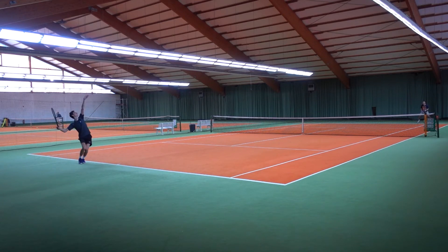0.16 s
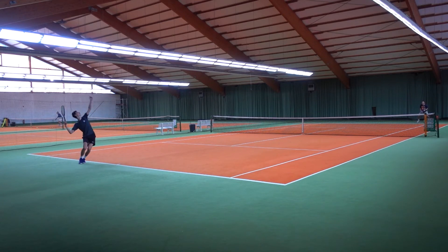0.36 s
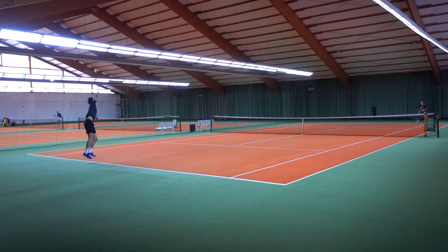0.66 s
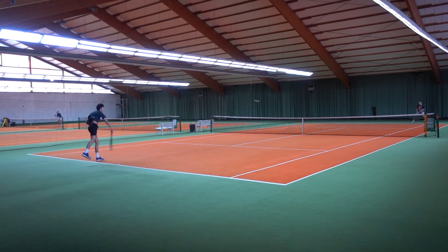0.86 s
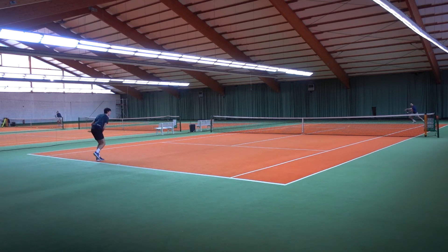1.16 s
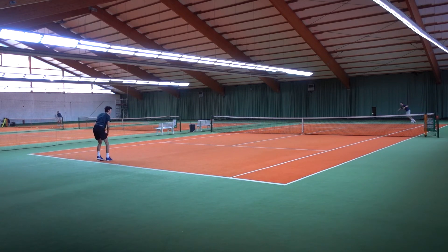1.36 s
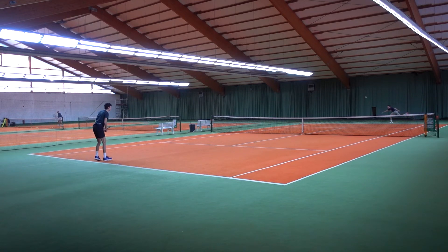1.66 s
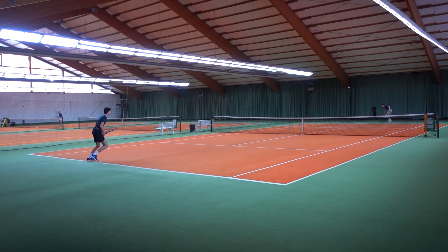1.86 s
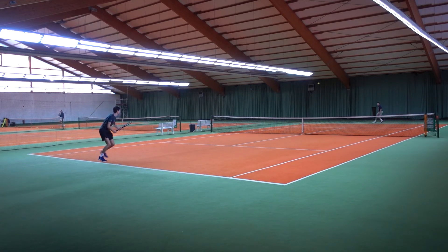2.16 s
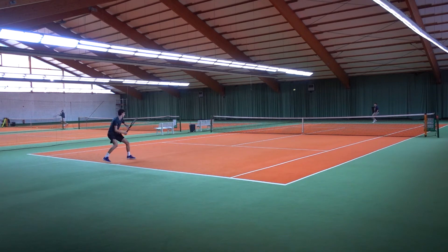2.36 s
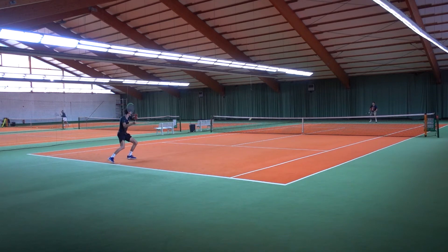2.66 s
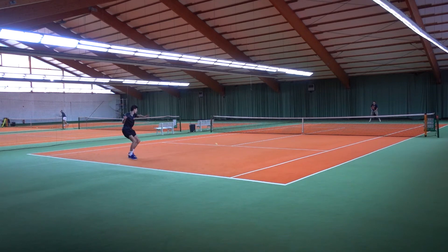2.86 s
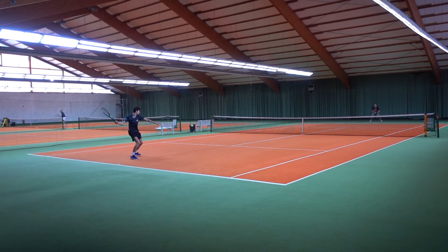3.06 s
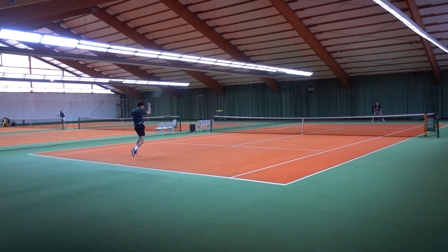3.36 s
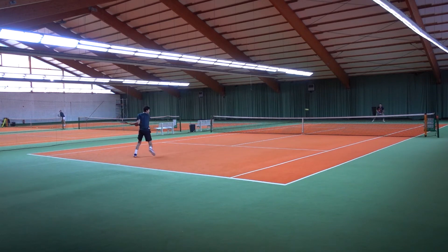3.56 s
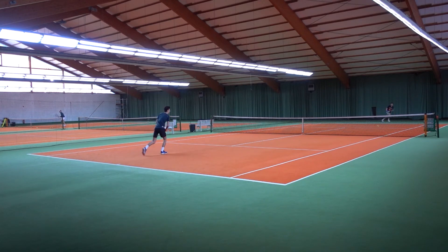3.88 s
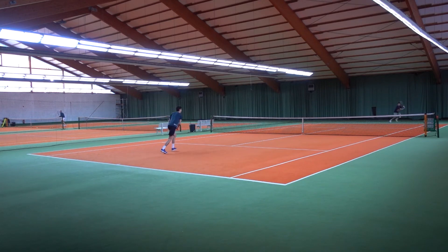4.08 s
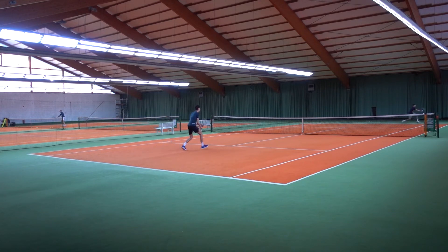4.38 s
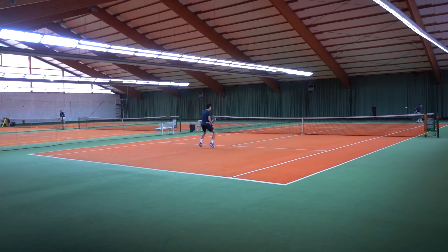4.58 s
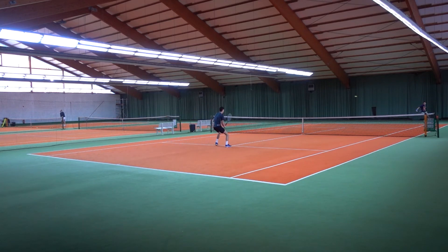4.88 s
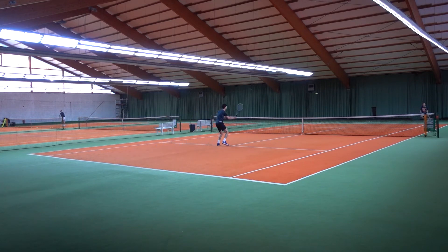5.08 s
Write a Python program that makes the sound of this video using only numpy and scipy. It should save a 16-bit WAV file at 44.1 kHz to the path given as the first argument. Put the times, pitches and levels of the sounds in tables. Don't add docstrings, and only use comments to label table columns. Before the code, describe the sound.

A tennis rally in a large indoor hall, heard from a small stereo microphone at the court corner. A dull bounce comes first, then a hard bright serve crack, a boomy bounce with the far return straight after, further bounces and a softer near stroke. Every hit rings and echoes long over faint ventilation hum and hiss.

```python
import sys
import numpy as np
from scipy import signal
from scipy.fft import rfft, irfft, next_fast_len
from scipy.io import wavfile
from scipy.ndimage import uniform_filter1d

SR = 44100
rng = np.random.default_rng(int(sys.argv[2]) if len(sys.argv) > 2 else 0)


def voltage_ratio(level):
    return 10 ** (np.asarray(level, float) / 20)


def file_out(sig):
    cols = np.atleast_2d(sig).T
    lim = np.clip(cols, -1, 1)
    pcm = np.round(lim * 32767).astype(np.int16)
    wavfile.write(sys.argv[1], SR, pcm)


N = 230363
TIME = np.arange(N) / SR
SIZE = next_fast_len(N)
FREQ = np.maximum(np.fft.rfftfreq(SIZE, 1 / SR), 1)
POP_SAMPLES, POP_LEAD_S = 2048, .001
HOLLOW_HZ = 290
STROKE_ECHO_MS, KNOCK_MS = 3.9, 3.6


def at(table, hz, axis=1):
    rows = np.array(table, float)
    return np.interp(np.log(hz), np.log(rows[:, 0]), rows[:, axis])


def band(x, hz, width_hz):
    return signal.lfilter(*signal.iirpeak(hz, hz / width_hz, fs=SR), x)


def steep(x, hz, width_hz):
    y = band(band(x, hz, width_hz), hz, width_hz)
    return y / np.sqrt(np.mean(y ** 2))


def peak(x, db):
    return x * voltage_ratio(db) / np.abs(x).max()


def pair(mid, side, hz):
    # [f/Hz, likeness 0-1]
    likeness = [(60, 0.7), (125, .99), (250, 1), (500, 0.96), (1000, 0.76), (2000, 0.76), (4000, 0.18),
                (8000, 0.07)]
    c = np.clip(at(likeness, hz), 0, 1)
    return np.sqrt((1 + c) / 2) * mid + np.sqrt((1 - c) / 2) * side * np.array([[1], [-1]])


def walk(rate_hz):
    hold = int(SR / rate_hz)
    steps = np.repeat(rng.standard_normal(N // hold + 1), hold)
    return 0.98 * uniform_filter1d(uniform_filter1d(steps, hold), hold)[:N]


def air():
    # [f/Hz, level/dB per Hz]
    air_spectrum = [(24, -84), (40, -44.5), (98, -25), (417, -9.5), (529, -11), (1100, -11.5),
                    (1500, -17.5), (2650, -21.5), (3440, -25.5), (10500, -30.5), (11500, -40.5),
                    (15000, -76), (22000, -120)]
    # [f/Hz, width/Hz, level/dB]
    duct = (380, 33, -63)
    mid, side = rfft(rng.standard_normal((2, SIZE))) * voltage_ratio(at(air_spectrum, FREQ))
    hiss = irfft(pair(mid, side, FREQ), SIZE)[:, :N]
    duct_hz, duct_width_hz, duct_db = duct
    drone = steep(rng.standard_normal(N), duct_hz, duct_width_hz) * voltage_ratio(duct_db + 1.0 * walk(5.28))
    return hiss * voltage_ratio(-61.5) / np.std(hiss) + drone


def hall():
    # [t/s, near surfaces/dB, far walls/dB, bass/dB, treble/dB]
    tails = [(-.6, -60, -29.5, -7.5, 10), (0.442, -45, -39.5, -1, 2.5), (0.74, -20, -29, -5, -0.5),
             (1.26, -73, -58.5, 14.5, 12), (1.545, -42.5, -43, 0, 1.5), (1.595, -19, -27, -0.5, 2),
             (1.889, -18, -32, -26, -4), (2.261, -36.5, -38.5, 1, 0.5), (2.381, -34, -42, 4, -3),
             (2.903, -50, -53.5, -0.5, -8), (3.351, -22.5, -34, -0.5, 2.5), (3.713, -56, -50.5, 6, 7),
             (3.799, -55, -40, -1, -0.5), (4.452, -46.5, -63, 8, -6), (4.487, -34.5, -45.5, -3.5, -2),
             (4.53, -31, -42.5, 4, -4), (4.575, -21.5, -36, -3.5, 3.5), (5.101, -46, -47, -1.5, 7),
             (5.2, -41, -52, -8, 8)]
    # [f/Hz, colour/dB, reverberation/s]
    room = [(80, -40, 1.2), (160, -19, 2.45), (305, -4.5, 2.15), (690, -3, 1.69), (1160, -8, 1.8),
            (1480, -10.5, 1.77), (2200, -13, 1.47), (2910, -16.5, 1.02), (3460, -19.5, 1.14),
            (4840, -27, 0.93), (5470, -33, 0.89), (8000, -41, 1.1), (11000, -43, 0.73)]
    near_t60_s = 0.32
    echoes = rfft(rng.standard_normal((2, N)) * voltage_ratio(1.5 * walk(150)), SIZE) * voltage_ratio(at(room, FREQ))
    lumps_db = walk(24.77)
    coarse_s = TIME[::32]
    s, near_db, far_db, bass_db, treble_db = np.array(tails).T[:, :, None]
    fill_s = .09 + .003 * (near_db + 40)
    t = np.maximum(coarse_s - s, 0)
    out = 0
    for hz in 70 * 2 ** np.arange(0, 7.4, .4):
        t60_s = at(room, hz, axis=2)
        octave = np.log2(hz / 1000)
        body = np.interp(octave, [1.3, 2.3], [1, .3])
        fill = np.maximum(fill_s * body, .01)
        tilt_db = bass_db * np.clip(-octave, 0, 1) + treble_db * np.clip(octave - 1, 0, 1)
        near = voltage_ratio(near_db + tilt_db - 60 * t / min(near_t60_s, t60_s)) * (1 - np.exp(-t / 0.0038))
        far = voltage_ratio(far_db + tilt_db - 60 * np.maximum(t - fill, 0) / t60_s)
        far = far * np.clip(t / fill, 0, 1) ** 0.56
        size = np.interp(TIME, coarse_s, np.sqrt(np.sum(near ** 2 + far ** 2, axis=0)))
        window = np.cos(np.pi / 2 * np.clip(np.log2(FREQ / hz) / .4, -1, 1)) ** 2
        mid, side = irfft(echoes * window, SIZE)[:, :N]
        level_db = 15.0 + body * (0.4 * lumps_db + 3.3 * walk(12))
        out = out + voltage_ratio(level_db) * size * pair(mid, side, hz)
    return out


def bounces():
    # [t/s, ring/dB, ring f/Hz, thump/dB, echoes/dB]
    court_hits = [
        (0.4438, -27.5, 1700, -29, -14),
        (1.5466, -31, 1306, -19, -6),
        (2.2636, -25, 2120, -30.5, -1),
        (3.7135, -28.5, 2900, -23, -2),
        (4.4868, -20, 1550, -28.5, -9),
        (5.1036, -28.5, 2370, -24, -2),
    ]
    # [delay/s, ring/dB, thump/dB]
    side_walls = [(.058, -6, -6), (.096, -6, -14)]
    crack_db, contact_ms = -24, 5.8
    rows = []
    for s, ring_db, hz, thump_db, echo_db in court_hits:
        thump_hz = HOLLOW_HZ + 11 * (thump_db + 30)
        for lag_s, ring_change, thump_change in [(0, 0, 0)] + side_walls:
            extra_db = echo_db * (lag_s > 0)
            ring = ring_db + ring_change + extra_db
            thump = thump_db + thump_change + extra_db
            rows.append((s + lag_s, ring, ring + crack_db, hz, contact_ms, thump, thump_hz))
    return rows


def rings():
    ring_starts = (.445, .503, .742, .85, 1.0, 1.594, 1.888, 2.39, 2.905, 3.354, 3.42, 3.715, 4.576, 4.72)
    # [f/Hz, width/Hz, level/dB, reverberation/s]
    ring_tones = [
        [(1856, 140, -47, 2.0)],
        [(3600, 1600, -52, 0.9), (1004, 230, -45.5, 2.1)],
        [(2082, 200, -32, 0.8), (993, 220, -35, 1.8), (4340, 1600, -41, 1.1), (8500, 4400, -49, 0.64)],
        [(1200, 250, -33, 1.12)],
        [(560, 200, -41, 1.5)],
        [(481, 150, -31, 1.3), (824, 220, -32.5, 0.82), (2000, 1200, -37, 1.0), (8000, 3700, -58, 0.33)],
        [(807, 65, -21.5, 0.22), (1480, 190, -22.5, 0.34), (2300, 800, -28, 0.65), (2950, 300, -30, 0.6)],
        [(656, 180, -45, 1.25)],
        [(900, 700, -37, 0.12)],
        [(2114, 220, -45, 1.9), (4500, 1500, -48.5, 1.4), (8900, 4400, -55, 0.63)],
        [(1000, 500, -35.5, 1.42)],
        [(3020, 210, -55, 1.43)],
        [(2590, 200, -36.5, 0.8), (950, 500, -31.5, 1.1)],
        [(3400, 400, -51, 0.91), (2560, 240, -53, 1.0)],
    ]
    out, t = np.zeros((2, N + SR)), np.arange(SR) / SR
    broken = voltage_ratio(2.5 * walk(40))
    for s, tones in zip(ring_starts, ring_tones):
        i = int(s * SR)
        for hz, width_hz, db, t60_s in tones:
            mid, side = steep(rng.standard_normal((2, SR)), hz, max(width_hz, hz / 13))
            size = voltage_ratio(db - 60 * t / t60_s) * (1 - np.exp(-t / 0.001)) * (1 - t ** 4)
            out[:, i:i + SR] += size * pair(mid, side, hz)
    return out[:, :N] * broken


def knocks():
    # [t/s, ring/dB, ring f/Hz, thump/dB, thump f/Hz]
    floor_knocks = [(0.4912, -50, 1860, -36, 353), (0.5377, -27, 2100, -35, 910),
                    (0.9063, -36, 1270, -21, 1250), (2.384, -22, 890, -18.5, 280),
                    (2.3904, -28, 2160, -20, 677), (2.9046, -43, 1000, -30.5, 305),
                    (2.911, -44, 1100, -33, 800), (2.939, -46, 900, -38.5, 400),
                    (4.451, -50, 900, -40, 530), (4.528, -31, 900, -20, 740),
                    (4.536, -38, 2400, -21.5, 505)]
    return [(s, ring_db, ring_db - 36, hz, KNOCK_MS, thump_db, thump_hz)
            for s, ring_db, hz, thump_db, thump_hz in floor_knocks]


def ticks():
    # [t/s, ring/dB, ring f/Hz]
    light_ticks = [(0.5043, -21.5, 1880), (0.6104, -40, 2800), (1.0809, -32, 1200), (1.2664, -44, 970),
                   (2.5468, -35.5, 910), (3.6439, -31, 1900), (3.6778, -31, 2300), (3.826, -34, 3000),
                   (4.488, -28, 2750)]
    return [(s, ring_db, ring_db - 34, hz, KNOCK_MS, -80, HOLLOW_HZ) for s, ring_db, hz in light_ticks]


def swings():
    # [swell/s, level/dB]
    racket_swings = [
        (.05, -46.5),
        (.055, -54.5),
    ]
    contacts = (.742, 3.353)
    swell = np.zeros(N)
    for (rise_s, db), s in zip(racket_swings, contacts):
        swell += voltage_ratio(db) * np.clip(1 + (TIME - s) / rise_s, 0, 1) ** 0.67 * (TIME < s)
    low = steep(rng.standard_normal(N), 2200, 1700)
    high = steep(rng.standard_normal(N), 3600, 5300)
    return swell * (low + voltage_ratio(-0.5) * high)


def strokes(hits, roof, walls, early, contact_ms):
    wall_step, wall_fade_db = .197, -3
    rows = []
    for hit, beams, wall in zip(hits, roof, walls):
        s, ring_db, crack_db, thump_db, thump_hz = hit
        rows.append((s, ring_db, crack_db, 2000, contact_ms, thump_db, thump_hz))
        up_db, low_db, fade_db, ratio = beams
        for k, (lag_s, hz, low_hz) in enumerate(early):
            echo_db = up_db + k * fade_db
            echo_crack_db = max(crack_db - ring_db, -24) + echo_db - 6
            rows.append((s + lag_s, echo_db, echo_crack_db, ratio * hz, STROKE_ECHO_MS,
                         low_db + k * fade_db, low_hz))
        first_s, wall_db, dull_db = wall
        for k in range(3):
            lost_db = k * wall_fade_db
            rows.append((s + first_s * (1 + k * wall_step), wall_db + lost_db, wall_db - 28, 1200,
                         STROKE_ECHO_MS, dull_db + lost_db, 680))
    return rows


def near_strokes():
    # [t/s, ring/dB, crack/dB, thump/dB, thump f/Hz]
    near_hits = [
        (0.7416, -8, -11, -19.5, 398),
        (3.3516, -22.5, -19, -21, 700),
    ]
    # [ring/dB, thump/dB, change per echo/dB, pitch ratio]
    near_roof = [(-22, -21, -8, 1.0), (-23, -18.5, -1, 1.05)]
    # [first delay/s, ring/dB, thump/dB]
    near_walls = [(.165, -32, -26), (.1215, -33, -27)]
    # [delay/s, ring f/Hz, thump f/Hz]
    near_early = [(.012, 2150, 470), (.021, 2080, 540), (.033, 1500, 370)]
    return strokes(near_hits, near_roof, near_walls, near_early, 6.2)


def far_strokes():
    # [t/s, ring/dB, crack/dB, thump/dB, thump f/Hz]
    far_hits = [
        (1.5933, -11.5, -46, -17, 567),
        (1.887, -22, -50, -22, 813),
        (4.5742, -28, -37, -26, 880),
    ]
    # [ring/dB, thump/dB, change per echo/dB, pitch ratio]
    far_roof = [(-17, -23, -.5, .85), (-14, -25, -1, 1.1), (-18.5, -24, -3.5, 1.05)]
    # [first delay/s, ring/dB, thump/dB]
    far_walls = [(.131, -30, -19), (.078, -33, -45), (.169, -40, -38)]
    # [delay/s, ring f/Hz, thump f/Hz]
    far_early = [(.009, 2200, 700), (.017, 1400, 600), (.031, 2250, 470), (.038, 1350, 600),
                 (.053, 1500, 420)]
    return strokes(far_hits, far_roof, far_walls, far_early, 3.3)


def arrivals():
    return near_strokes() + far_strokes() + bounces() + knocks() + ticks()


def pops():
    # [f/Hz, width/Hz, level/dB]
    shell_modes = [(1200, 167, 2), (2047, 610, 8), (2880, 230, -11)]
    out, t = np.zeros((2, N + POP_SAMPLES)), np.arange(POP_SAMPLES) / SR
    felts = rng.standard_normal((55, 4, POP_SAMPLES))
    for k, (s, ring_db, crack_db, hz, contact_ms, _, _) in enumerate(arrivals()):
        u = t / max(contact_ms, .5) * 1000
        noise = felts[k % len(felts)]
        burst = noise[:2] * u ** 0.76 * np.exp(-1.8 * u)
        modes = sum(voltage_ratio(db) * band(burst, f, w) for f, w, db in shell_modes)
        ring = band(burst, hz, .2 * hz) + voltage_ratio(-14) * modes
        ring = band(ring, 1670, 3100)
        crack = steep(noise[2:] * u ** 0.21 * np.exp(-1.6 * u), 5700, 7000)
        i = int((s - POP_LEAD_S) * SR)
        spot = out[:, i:i + POP_SAMPLES]
        spot += pair(peak(ring[0], ring_db - 2.0), peak(ring[1], ring_db - 5.0), 2000)
        spot += pair(peak(crack[0], crack_db - 3.5), peak(crack[1], crack_db - 3.0), 3000)
    return out[:, :N]


def thumps():
    out, t = np.zeros(N + POP_SAMPLES), np.arange(POP_SAMPLES) / SR
    thump_ms, bass_cut_hz = 4.1, 180
    u = t / thump_ms * 1000
    for s, *_, db, hz in arrivals():
        i = int((s - POP_LEAD_S) * SR)
        cycles = np.sin(2 * np.pi * hz * t) * u ** 1.47 * np.exp(-2.5 * u)
        out[i:i + POP_SAMPLES] += peak(cycles, db - 1.5)
    return signal.sosfilt(signal.butter(2, bass_cut_hz, "high", fs=SR, output="sos"), out[:N])


def scene():
    return air() + hall() + rings() + swings() + pops() + thumps()


def band_limit(x):
    return signal.sosfilt(signal.butter(12, 11910, fs=SR, output="sos"), x)


def record(dry):
    # [f/Hz, width/Hz, boost/dB]
    housing = [(1200, 940, 0.5), (2076, 260, 2), (2540, 300, 2), (7260, 250, -4.5)]
    # [f/Hz, left lead/rad]
    port_phase = [(0, 0), (350, .2), (1000, .3), (1700, .1), (3100, 0), (4400, -3), (5400, -3.2),
                  (7200, -4.6), (11500, -5.2)]
    top_hz, right_db = 11040, 1.33
    x = dry + sum((voltage_ratio(db) - 1) * band(dry, hz, w) for hz, w, db in housing)
    hz, lead_rad = np.transpose(port_phase)
    right = voltage_ratio(right_db * np.clip(FREQ / 2000, 0, 1)) * np.exp(-1j * np.interp(FREQ, hz, lead_rad))
    cut = np.clip((top_hz - FREQ) / 60, voltage_ratio(-45), 1)
    ports = np.array([np.ones_like(right), right])
    mix = irfft(rfft(x, SIZE) * ports * cut, SIZE)[:, :N]
    return band_limit(mix)


dry = scene()
out = record(dry)
file_out(out)
```